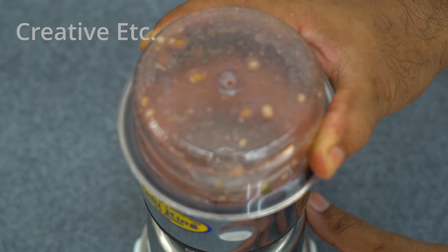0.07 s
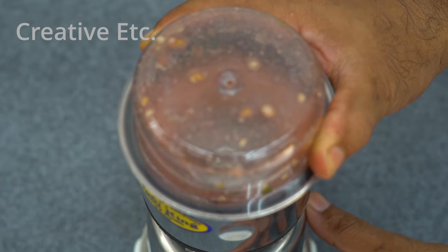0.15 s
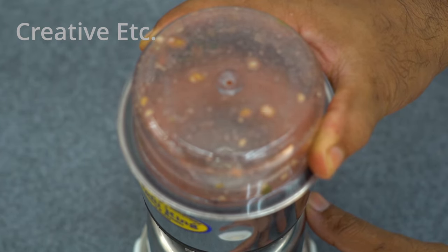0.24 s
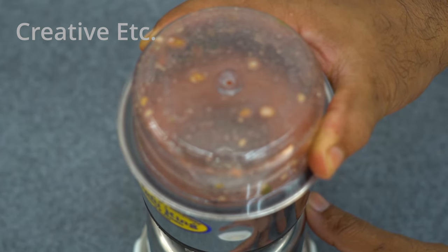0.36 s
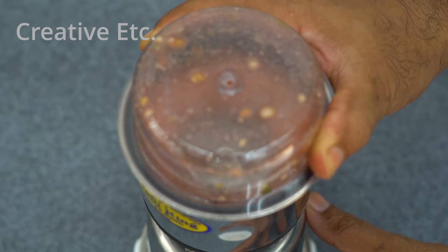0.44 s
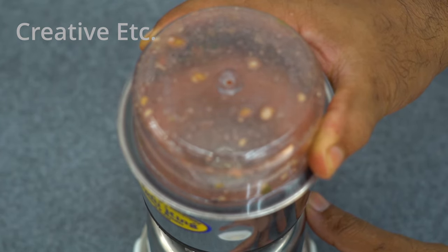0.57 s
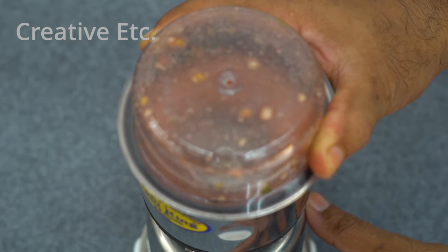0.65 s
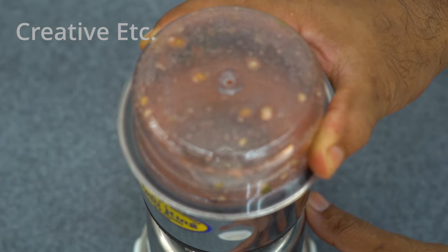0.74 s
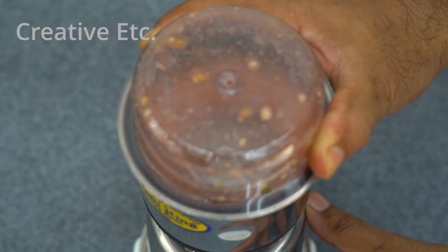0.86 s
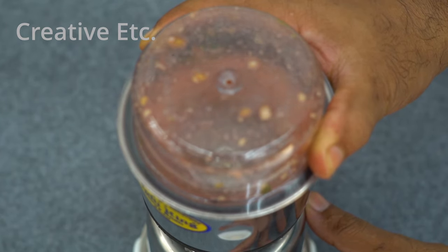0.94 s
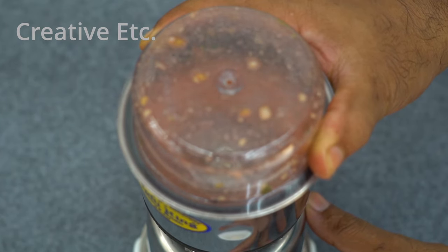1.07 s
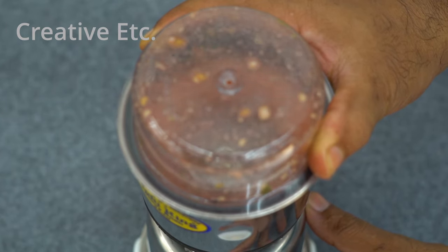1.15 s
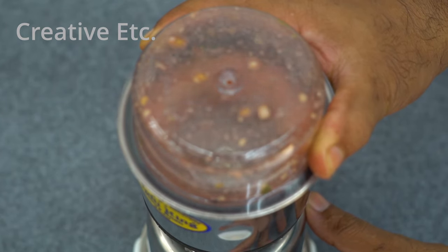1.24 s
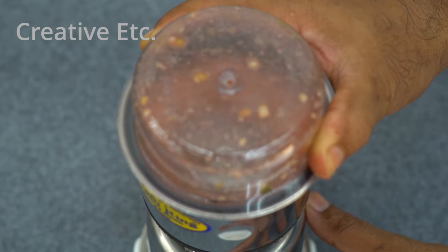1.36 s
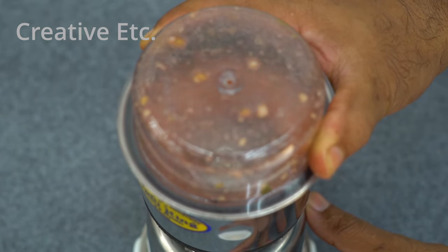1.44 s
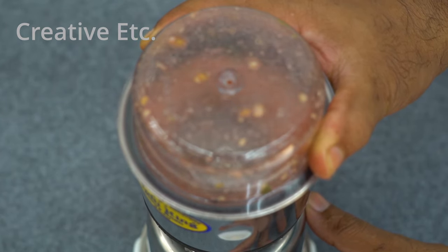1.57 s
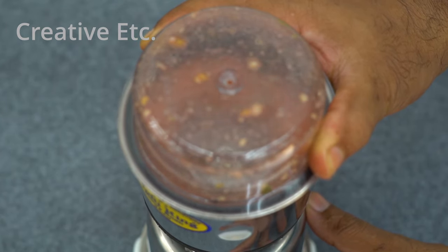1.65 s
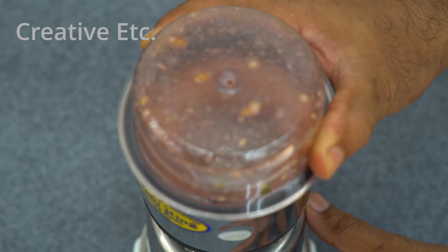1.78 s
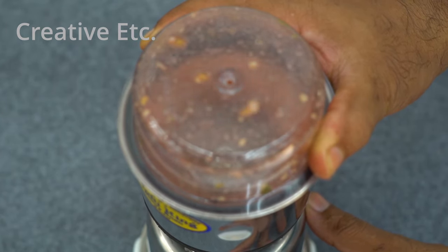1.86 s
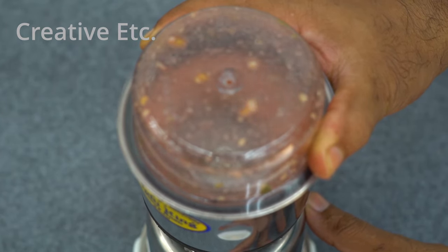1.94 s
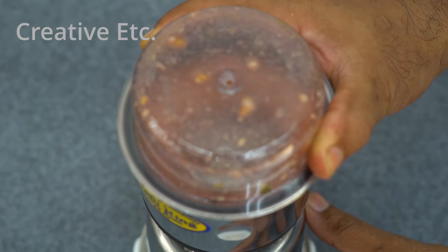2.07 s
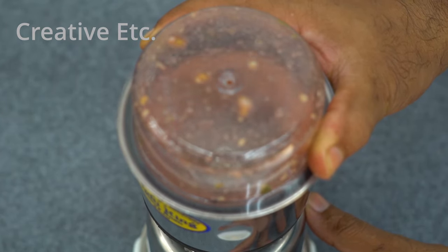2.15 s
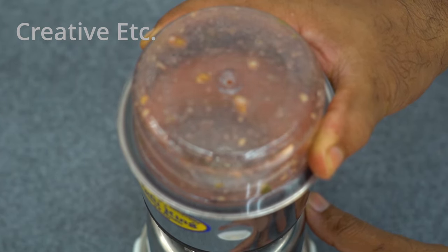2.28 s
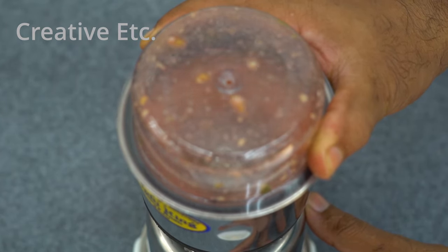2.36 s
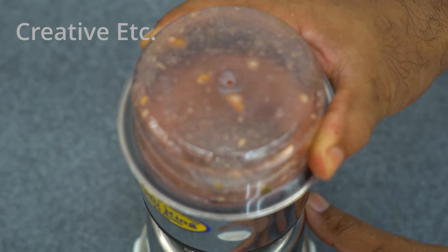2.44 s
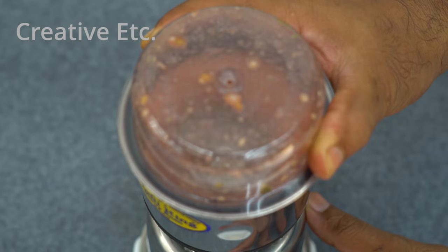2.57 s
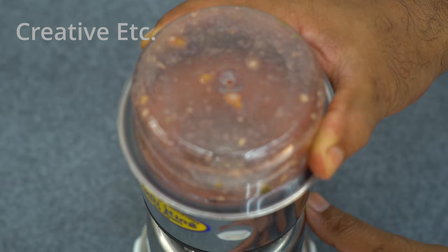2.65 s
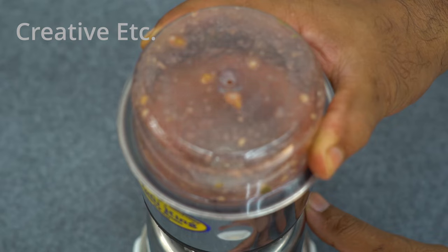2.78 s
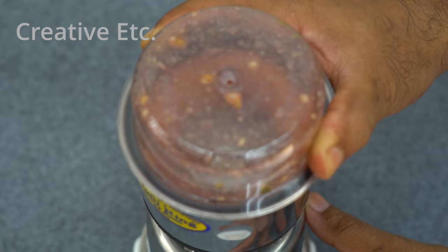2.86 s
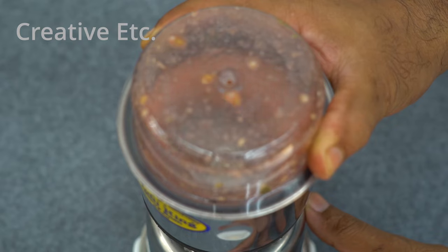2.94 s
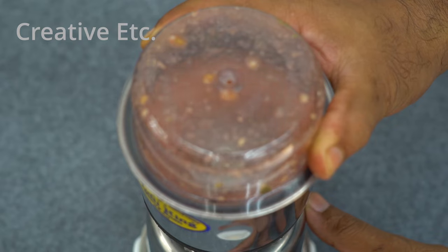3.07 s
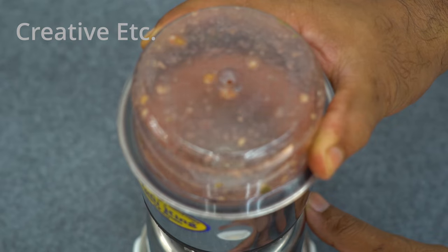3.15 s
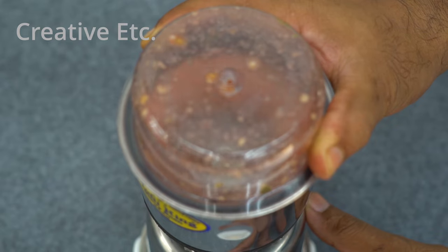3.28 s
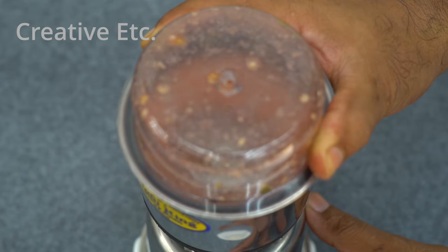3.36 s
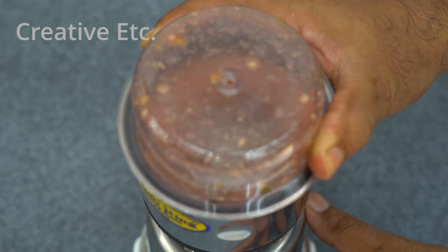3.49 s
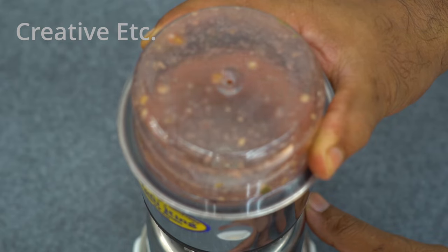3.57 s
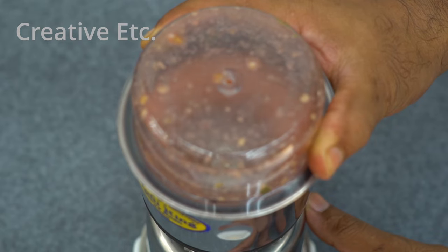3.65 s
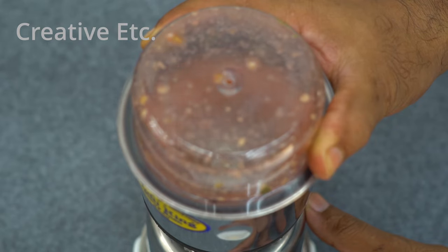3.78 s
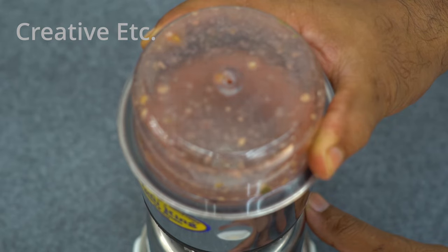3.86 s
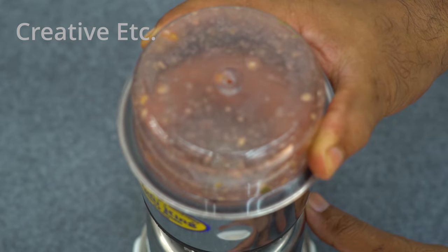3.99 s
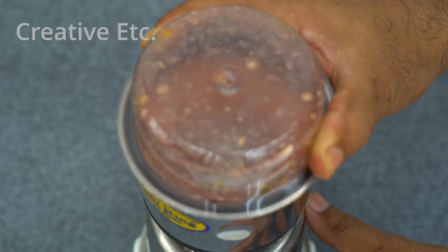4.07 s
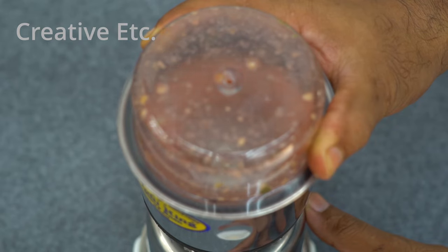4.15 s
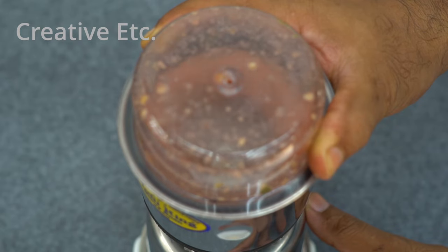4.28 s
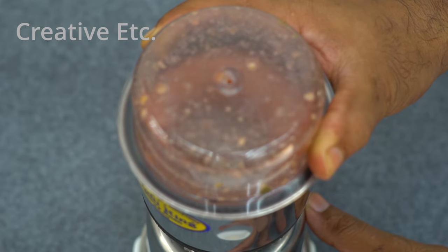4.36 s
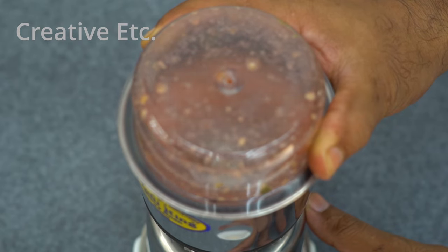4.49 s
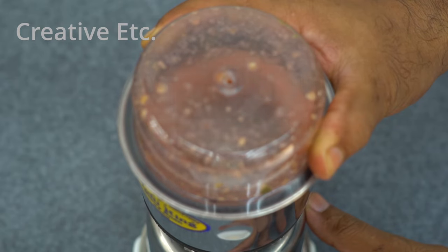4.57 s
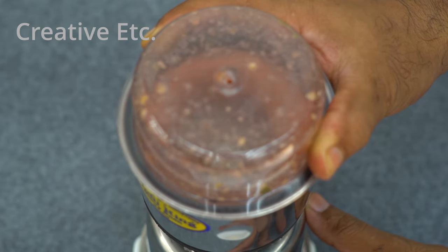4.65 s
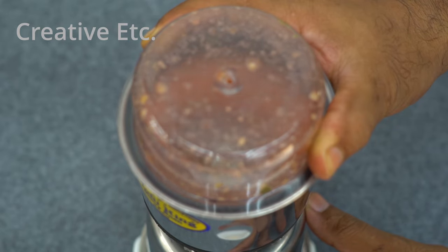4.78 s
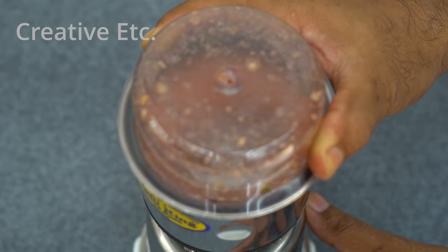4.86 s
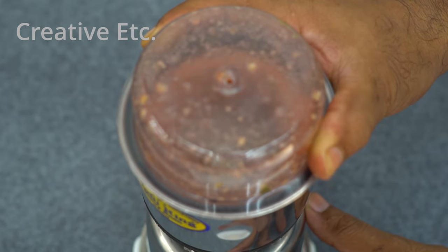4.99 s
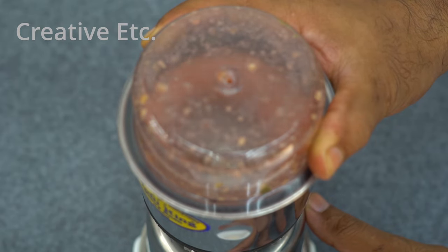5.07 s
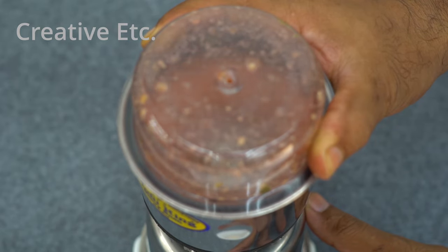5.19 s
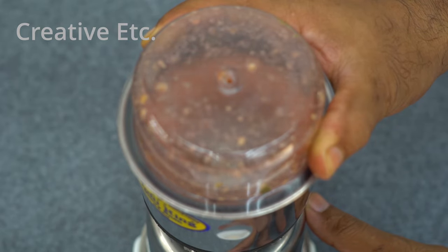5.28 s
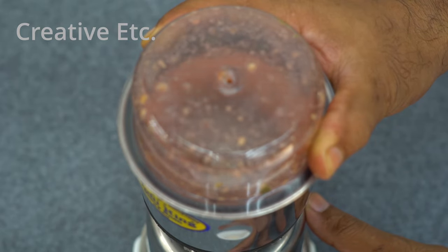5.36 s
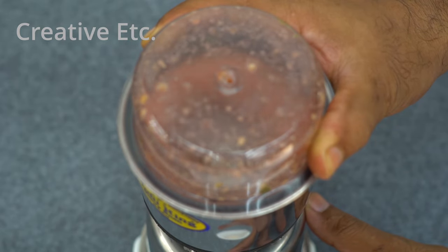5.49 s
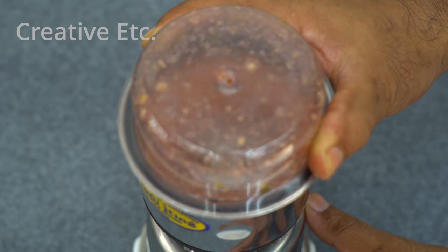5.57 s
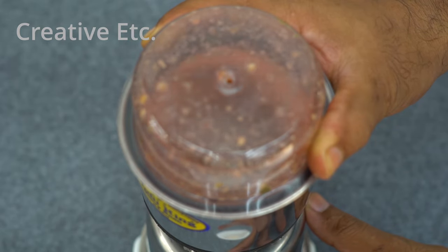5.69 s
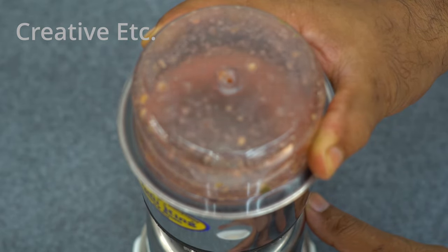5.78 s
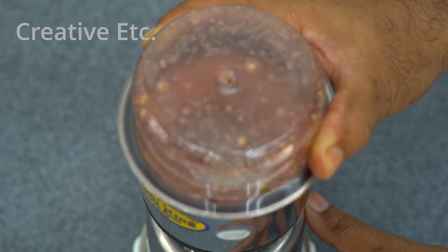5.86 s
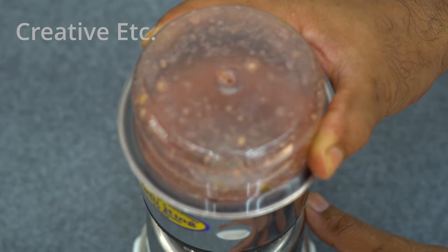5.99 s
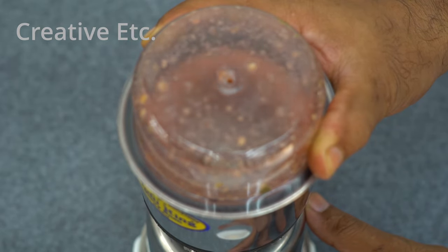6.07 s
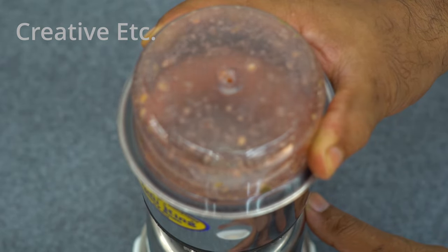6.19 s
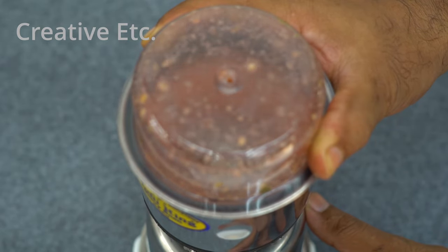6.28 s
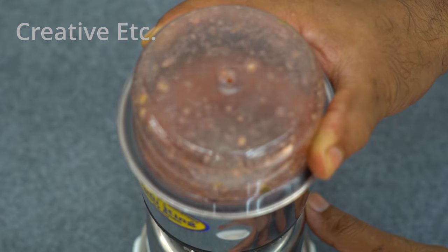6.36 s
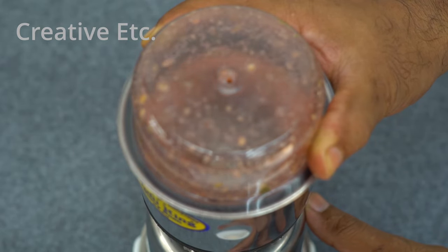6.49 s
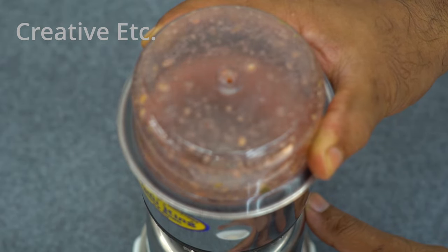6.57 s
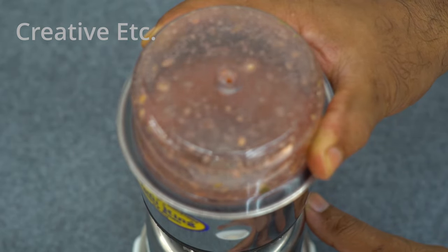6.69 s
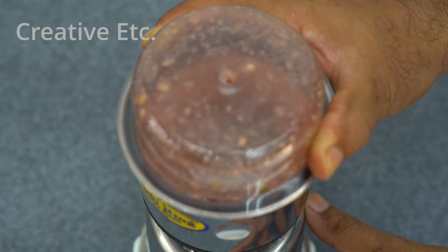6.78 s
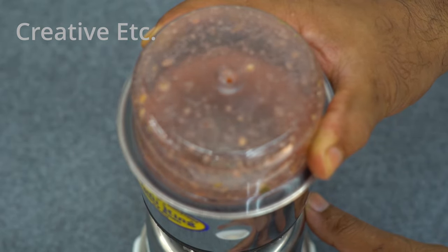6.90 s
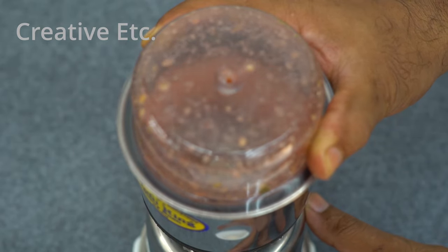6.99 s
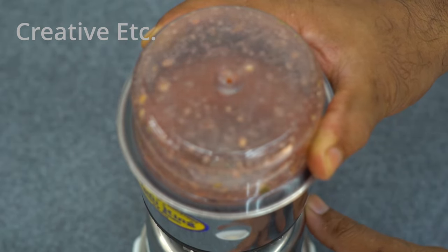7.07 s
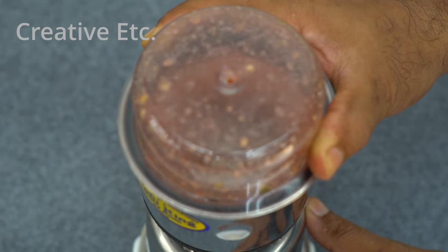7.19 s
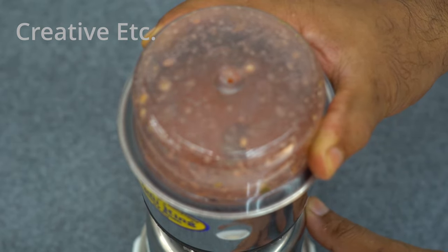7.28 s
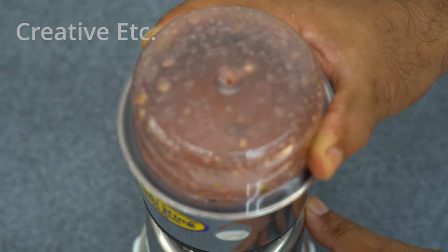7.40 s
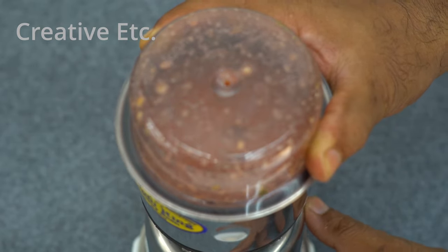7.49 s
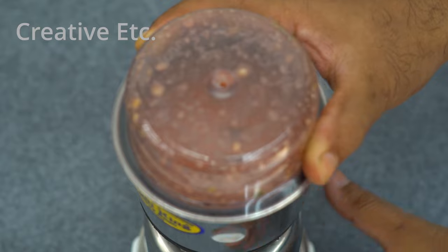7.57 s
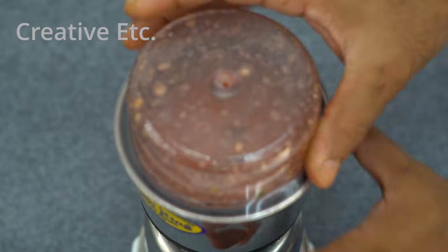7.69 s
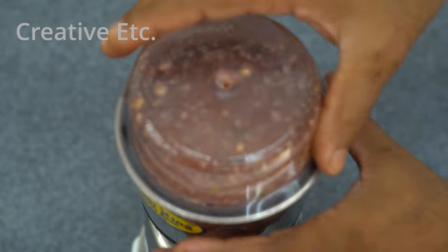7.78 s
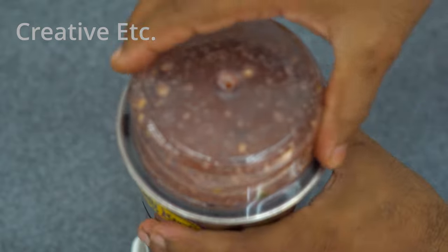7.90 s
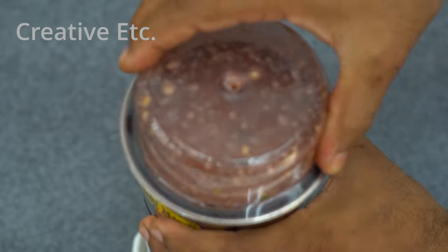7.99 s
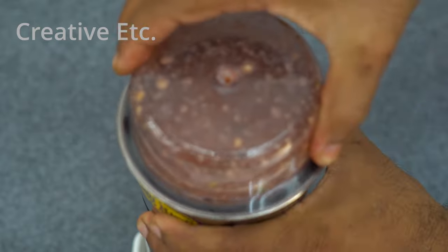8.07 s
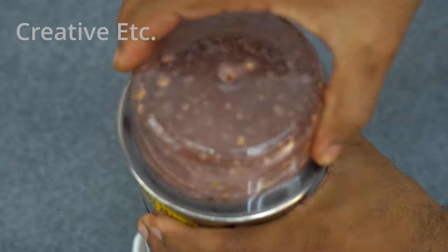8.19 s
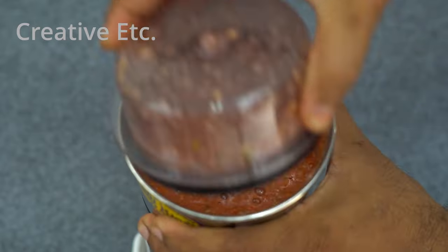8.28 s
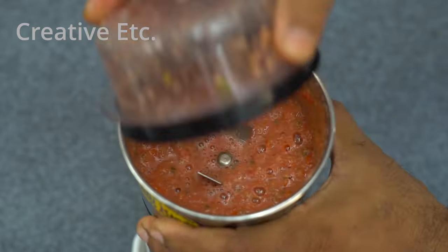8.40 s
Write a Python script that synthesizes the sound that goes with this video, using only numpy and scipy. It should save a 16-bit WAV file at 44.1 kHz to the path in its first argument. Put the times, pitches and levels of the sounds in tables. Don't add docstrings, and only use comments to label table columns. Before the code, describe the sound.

From 0 to 7.2 s a small motor runs continuously, loud and close: a rough, noisy grind strongest between about 1 and 4 kHz, fluttering as wet food batters plastic and metal walls, with bright spray above and a low hum and table rumble beneath. It eases very slightly as chunks become paste. Dull can thumps come at 3.3 and 4.1 s; at about 4.26 s the grind dips for an instant, then kicks back. At 7.2 s it cuts off, dying within a few tenths into quiet fan air around 1.4 kHz and a barely audible high whine. Faint finger ticks and brushing follow from 7.3 s, a soft squeak around 7.8 to 8.05 s. From 8.0 s the jar twists in jerks: gritty scrapes, hollow low moans, ringing creaks, strongest at 8.2 and 8.3 s, with knocks thickening until the end at about 8.4 s.

```python
import sys
import numpy as np
from scipy import signal
from scipy.fft import rfft, irfft, next_fast_len
from scipy.io import wavfile
from scipy.ndimage import uniform_filter1d

SR = 44100
rng = np.random.default_rng(int(sys.argv[2]) if len(sys.argv) > 2 else 0)


def decibels_to_gain(level_db):
    exponent = np.asarray(level_db, float) / 20
    return 10 ** exponent


def digitize_waveform(pressure):
    field = np.atleast_2d(pressure).T
    bounded = np.clip(field, -1, 1)
    quanta = np.round(bounded * 32767).astype(np.int16)
    wavfile.write(sys.argv[1], SR, quanta)


N = 372195
T = np.arange(N) / SR
BINS_HZ = np.arange(N // 2 + 1) * SR / N
STOP_S = 7.191

# frequency in Hz, density in dB per Hz.
CHURN = [(120, -67.5), (200, -2.5), (333, -22.5), (455, -8), (526, -4.5), (927, -13), (1290, -13),
         (2150, -6), (2580, -5.5), (2870, -5.5), (3920, -10), (7290, -10), (9590, -14.5), (13300, -13),
         (15700, -15)]
WALL_HZ = [335, 530, 656, 819, 1168, 1301, 1400, 1505, 1620, 1760, 1890, 2005, 2108, 2212, 2375, 2620, 2785,
           2870, 2945, 3070, 3180, 3300, 4300, 4965, 5685, 6050, 7000, 7430, 7950, 8150, 10700, 13100]
# width in Hz, level in dB over the churn.
WALLS = [(50.1, -14.5), (40, 13.5), (45.2, 8), (41.6, 2), (39.7, -4), (44.7, 7.5), (50, -1), (50, 5.5),
         (49.7, 3), (119.6, 0), (59.5, 1.5), (59, 5.5), (49.4, 1), (50, 5.5), (63.1, 4), (196, -4),
         (50, -4), (54.7, 7), (50, 0), (70, -6), (109, 0), (60, -24), (90, -10), (55.8, 4.5), (60, 0),
         (91.7, -3.5), (120, 1), (50, 8.5), (50.25, 2), (70, 2), (90, -1), (260, -5.5)]
# time in seconds, level in dB.
GRIP = [(0.0, 0.3), (0.09, -3), (0.21, 2), (0.3, 1.0), (0.39, 2), (2.1, 0.9), (4.65, -1.7), (4.74, 0.5),
        (4.83, -1.5), (4.98, -4.2), (5.28, -1.5), (5.37, -2.8), (6.27, 0.7), (6.42, 0.5), (6.78, -5.5),
        (6.93, -2.8), (7.02, 1), (7.15, -3.2)]
# frequency in Hz, left minus right in dB.
PORTS = [(200, -7), (400, 1.5), (1300, -0.5), (2300, -2.5), (2900, -0.5), (3500, 1), (4000, 2), (5000, 0),
         (6400, 4.5), (7400, 1.5), (8800, 1.5), (15000, 3.5)]
# start in seconds, radians.
PORT_TURNS = [(0.0, -0.7), (0.14, 1.5), (0.2, 3.0), (0.25, 0.0), (0.32, 3.1), (0.36, -0.0), (0.39, 1.9),
              (0.52, 0.1), (0.57, 3.2), (0.62, 5.9), (0.73, 4.2), (0.81, 5.2), (1.19, 4.3), (1.3, 2.6),
              (1.43, 4.7), (1.57, 2.1), (1.6, -0.9), (1.89, 1.4), (1.97, 3.4), (2.06, 1.7), (2.12, 4.7),
              (2.2, 3.4), (2.31, 0.6), (2.41, -1.3), (2.71, -4.1), (2.91, -1.4), (2.94, -4.0), (3.1, -6.1),
              (3.2, -9.2), (3.32, -6.7), (3.4, -4.4), (3.48, -7.4), (3.59, -9.8), (3.77, -8.2),
              (3.95, -10.4), (4.09, -12.9), (4.2, -15.2), (4.71, -16.4), (5.01, -15.5), (5.2, -18.2),
              (5.38, -16.7), (5.55, -14.9), (5.66, -13.1), (5.7, -15.9), (5.74, -13.1), (5.78, -10.6),
              (5.84, -9.3), (5.97, -8.3), (6.08, -6.7), (6.15, -3.8), (6.29, -6.8), (6.36, -9.4),
              (6.41, -11.5), (6.59, -14.6), (6.69, -12.5), (6.84, -15.2), (6.91, -17.1), (7.01, -18.6),
              (7.13, -16.0), (7.25, -17.9)]
RUN_EDGES_HZ = [230, 450, 950, 4000, 6500, 10500, 15700]
RUN_T60_S = [0.2, 0.31, 0.41, 0.28, 0.21, 0.19]
SPRAY_DB = [-47, -48, -54]
# time in seconds, level in dB.
SHAKE = [(0.0, 1.5), (0.09, 1.5), (0.54, 1.5), (1.38, 0.8), (1.98, 1.5), (2.13, 0.5), (2.58, 0),
         (2.67, 2.2), (2.85, -1), (3.09, -3.5), (3.18, -2), (3.57, -2.8), (3.69, -0.5), (3.96, -0.0),
         (4.44, 0.5), (6.03, -2.5), (7.08, 0), (7.15, 4.2)]
# start in seconds, hold in seconds, level in dB.
ROCKS = [
    (3.26, 0.045, -50.5),
    (3.38, .09, -59.5),
    (4.09, 0.12, -47.5),
    (4.33, 0.074, -54),
    (4.42, 0.058, -54),
]
# time in seconds, level in dB.
PRESS = [(0.0, 11.7), (0.15, 4), (0.33, 0), (0.45, 6.5), (0.54, 12.5), (0.63, -2), (0.72, -8), (0.81, -1.0),
         (0.9, -0.3), (0.99, 4), (2.28, 1), (2.79, -1), (3.45, -3), (3.63, -6), (4.26, -0.5), (6.33, -8),
         (6.99, -4), (7.15, -1)]
# frequency in Hz, density in dB per Hz.
ROOM = [(60, -39), (190, -28), (300, -21), (600, -29.5), (980, -23.5), (1150, -10), (1400, -3.5),
        (1750, -13), (1900, -24), (2300, -27.5), (3500, -29.5), (6500, -32), (7500, -39), (14000, -43)]
# centre in Hz, width in Hz, level in dB over the fan.
DUCT = (1000, 22, 4)
# frequency in Hz, level in dB rms.
LAMP = [(14783, -107), (14879, -83), (14982, -88), (15079, -86)]
# centre in seconds, length in seconds, Hz, width in Hz, level
# in dB.
BURSTS = [(7.72, .035, 3150, 350, -77), (7.72, .03, 5000, 1500, -78), (7.72, .03, 7300, 2000, -84),
          (7.66, .14, 4750, 60, -92), (7.7, .12, 5380, 80, -86), (7.7, .12, 10000, 200, -95),
          (7.6, .12, 6200, 300, -95), (7.9, .08, 6500, 100, -94), (7.7, .1, 2540, 40, -91),
          (7.8, .05, 2370, 40, -91), (7.6, .4, 1930, 15, -92), (7.47, .12, 2900, 700, -84),
          (7.62, .12, 4000, 2500, -89), (7.53, .12, 2830, 60, -87), (7.33, .06, 1270, 30, -68),
          (7.36, .1, 1260, 50, -70), (7.505, .012, 900, 900, -76), (7.56, .1, 700, 300, -86),
          (8.075, .08, 915, 30, -76), (8.115, .025, 1250, 50, -70), (7.44, .12, 2800, 70, -74)]
# start in seconds, level in dB, frequency in Hz, left minus right in dB.
KNOCKS = [(7.501, -79, 685, -1), (8.0, -69, 336, -2), (8.042, -69, 333, 1.5), (8.087, -68, 680, 2.0),
          (8.2, -63, 660, 1.0), (8.203, -63, 270, -3), (8.286, -57, 636, 1.0), (8.315, -60, 474, 5),
          (8.371, -53, 685, 2), (8.374, -54, 438, 3), (8.4, -53, 710, 4), (8.407, -52, 341, -2),
          (8.424, -50, 321, 2)]
# time in seconds, slip rate in Hz, level in dB.
SQUEAK = [
    (7.78, 312, -94),
    (7.81, 306, -77),
    (7.9, 291, -79),
    (8.0, 279, -67),
    (8.05, 285, -80),
]
TWIST_EDGES_HZ = [230, 1100, 3600, 9300, 10500, 14200]
# centre in Hz, width in Hz, level in dB.
EMPTY_MODES = [(325, 60, -5), (475, 50, -8), (650, 70, -6), (926, 55, -12),
               (1490, 48, -8), (1860, 30, -9), (2100, 40, -5), (2210, 45, -5), (2360, 50, -8), (3110, 50, -6),
         (1250, 45, -7), (4170, 110, -9), (4420, 60, -10), (8720, 60, -15), (5960, 100, -19),
         (6380, 90, -16), (6770, 85, -16), (7300, 120, -15), (7750, 200, -16), (8150, 150, -12),
         (2870, 120, -17), (5300, 300, -23)]
# start in seconds, hold in seconds, scrape in dB, extra edge in dB.
TURNS = [
    (7.98, 0.15, -69.5, -9),
    (8.166, 0.046, -65.5, -10),
    (8.293, 0.069, -58, -1),
]
# start in seconds, hold in seconds, level in dB.
JERKS = [(8.02, .03, -72), (8.07, .015, -66), (8.17, .015, -66), (8.197, .006, -51.5), (8.23, .008, -70),
         (8.255, .006, -67), (8.295, .01, -62), (8.316, .008, -57), (8.35, .025, -70), (8.4, .03, -70)]
# start in seconds, hold in seconds, level in dB.
SLIDES = [(8.0, .04, -74), (8.045, .04, -68), (8.1, 0.0073, -71), (8.14, .015, -68), (8.175, .065, -80),
          (8.3, .015, -74), (8.32, .01, -67), (8.345, .01, -63), (8.395, .04, -59)]
# start in seconds, hold in seconds, level in dB.
DRAGS = [
    (8.03, 0.07, -72),
    (8.2, 0.024, -64),
    (8.3, 0.059, -56),
    (8.37, 0.025, -52),
    (8.405, .04, -60),
]
# start in seconds, hold in seconds, level in dB.
BITES = [
    (8.172, .008, -68),
    (8.19, .04, -77),
    (8.3, .01, -73),
    (8.335, 0.025, -77),
]
# time in seconds, frequency in Hz, level in dB.
MOAN = [(8.08, 325, -86), (8.12, 295, -68), (8.21, 335, -65), (8.27, 310, -67), (8.292, 365, -63),
        (8.32, 308, -66), (8.35, 312, -61), (8.39, 310, -66), (8.43, 325, -59)]


def unit(x):
    return x / np.sqrt(np.mean(x ** 2))


def columns(table):
    s, *cols = np.transpose(table)
    return [np.interp(T, s, c) for c in cols]


def colour(x, points, share=1):
    hz, db = np.transpose(points)
    gain_db = share * np.interp(np.log(BINS_HZ + 1), np.log(hz), db)
    return irfft(rfft(x) * decibels_to_gain(gain_db), N)


def split(x, edges_hz, steep=8):
    spectrum = rfft(x)
    below = [1 / (1 + (BINS_HZ / hz) ** steep) for hz in edges_hz]
    return [unit(irfft(spectrum * (high - low), N)) for low, high in zip(below, below[1:])]


def ring(x, hz, width_hz):
    return signal.lfilter(*signal.iirpeak(hz, hz / width_hz, SR), x)


def ring_twice(x, hz, width_hz):
    return ring(ring(x, hz, width_hz), hz, width_hz)


def walk(rate):
    k = int(SR / rate)
    held = np.repeat(rng.standard_normal(N // k + 1), k)
    return unit(uniform_filter1d(uniform_filter1d(held, k), k)[:N])


def flutter(rate):
    x = walk(rate)
    return x - uniform_filter1d(x, size=SR // 4)


def linger(gain, t60_s):
    keep = np.exp(-2 * np.log(1000) / (t60_s * SR))
    energy, _ = signal.lfilter([1 - keep], [1, -keep], gain ** 2, zi=[keep * gain[0] ** 2])
    return np.sqrt(energy)


def strokes(rows, attack_s, t60_s):
    power = 0
    for s, hold, db in rows:
        rise = np.clip((T - s) / attack_s, 0, 1)
        fall_db = 60 / t60_s * np.maximum(T - s - attack_s - hold, 0)
        power = power + (rise * decibels_to_gain(db - fall_db)) ** 2
    return np.sqrt(power)


def alike(x, share, turn):
    turned = np.real(signal.hilbert(x[0], next_fast_len(N))[:N] * np.exp(1j * turn))
    return np.array([x[0], np.sqrt(1 - min(share, .99) ** 2) * x[1] + share * turned])


def phase_steps():
    s, turn = np.transpose(PORT_TURNS)
    held = turn[np.clip(np.searchsorted(s, T) - 1, 0, None)]
    return uniform_filter1d(held, size=600) + .3 * walk(25) + .3 * walk(11)


def clatter(rate, spread_db, tail_s):
    size_db = spread_db * np.minimum(rng.exponential(size=N), 3)
    kicks = (rng.random(N) < rate / SR) * decibels_to_gain(size_db) ** 2
    swell = signal.lfilter([1], [1, -np.exp(-1 / (tail_s * SR))], kicks)
    return unit(np.sqrt(1 + uniform_filter1d(swell, size=40)) * rng.standard_normal((2, N)))


def detour(x):
    share, longest_ms, jumps_per_s = .48, 4.5, 16
    k = int(SR / jumps_per_s)
    lengths = rng.uniform(-0.998, 1, N // k + 1) * longest_ms * SR / 1000
    lag = np.repeat(lengths, k)[:N].astype(int)
    delayed = x[0][np.clip(np.arange(N) - lag, 0, N - 1)]
    echo = split(delayed, [700, 5500], steep=12)[0] * np.std(x[1])
    return np.array([x[0], np.sqrt(1 - share ** 2) * x[1] + share * echo])


def walls_rung_by_food():
    churn = colour(clatter(150, 1.0, 0.0013), CHURN)
    walls, grip_db = 0, 1.3 * columns(GRIP)[0]
    damping_db = -0.34 * (T - 3.5)
    for hz, (width, db) in zip(WALL_HZ, WALLS):
        swing_db = np.clip(hz / 1500, .4, 1) * (2.3 * flutter(18) + .4 * walk(2))
        if 2700 < hz < 3050:
            swing_db += grip_db
        else:
            swing_db += damping_db * (2000 < hz < 3500)
        lean = np.pi / 4 * (1 + np.tanh(walk(7)))
        shift_hz = .22 * width
        mode = np.cos(lean) * ring(churn, hz - shift_hz, width)
        mode = mode + np.sin(lean) * ring(churn, hz + shift_hz, width)
        walls = walls + decibels_to_gain(db + swing_db) * mode
    ceiling = 4.5
    return np.tanh(unit(churn + walls) / ceiling)


def rocking():
    return strokes(ROCKS, attack_s=.015, t60_s=0.46)


def run_gains():
    shake_db = columns(SHAKE)[0]
    jam_s, jam_length_s, dip_db, break_db, break_s = 4.255, 0.031, -18.5, 11.5, 0.013
    after = T - jam_s - jam_length_s
    jam_db = dip_db * np.exp(-(2 * (T - jam_s) / jam_length_s - 1) ** 2 * 2)
    jam_db = jam_db + break_db * (after > 0) * np.exp(-np.abs(after) / break_s)
    thump = np.hypot(decibels_to_gain(-62.5 + 0.38 * shake_db), rocking())
    hum = decibels_to_gain(-48 + shake_db)
    grind = decibels_to_gain(-34 - 0.1243 * T + jam_db)
    return [thump, hum, grind] + [decibels_to_gain(db + 0.4 * jam_db) for db in SPRAY_DB]


def blender(turn):
    left, right = walls_rung_by_food()
    both = np.array([colour(left, PORTS, share=0.99), colour(right, PORTS, share=-0.16)])
    thump, hum, grind, *spray = split(both, RUN_EDGES_HZ)
    thump = unit(ring(ring(thump, 325, 110), 335, 110))
    bands = [alike(thump, .97, turn), alike(hum, .8, turn), detour(grind)] + spray
    slosh = flutter(8)
    flicker_db = [1.7 * walk(14), .9 * flutter(12), .45 * slosh + .5 * flutter(24),
                  .5 * slosh + .4 * flutter(8), .5 * slosh + .7 * flutter(10), .4 * slosh + 1.2 * walk(9)]
    out = 0
    for band, gain, db, t60_s in zip(bands, run_gains(), flicker_db, RUN_T60_S):
        out = out + band * linger(gain * decibels_to_gain(db) * (T < STOP_S), t60_s)
    return out


def table(turn):
    modes = ring(ring(rng.standard_normal((2, N)), 92, 55), 110, 80)
    shake = unit(alike(modes, .99, turn - .45 * np.sin(2 * turn)))
    level_db = -82 + columns(PRESS)[0] + 2.6 * walk(6)
    return shake * linger(decibels_to_gain(level_db) * (T < STOP_S), 0.5)


def room():
    air = colour(rng.standard_normal((2, N)), ROOM)
    hz, width, db = DUCT
    level_db = -72 + 1.1 * walk(4.8) + 1.8 * walk(30)
    fan = decibels_to_gain(level_db) * unit(air + decibels_to_gain(db) * ring(air, hz, width))
    quarter = np.array([[0], [np.pi / 2]])
    return fan + sum(np.sqrt(2) * decibels_to_gain(db) * np.sin(2 * np.pi * hz * T + quarter) for hz, db in LAMP)


def bursts():
    out = np.zeros((2, N))
    for s, length, hz, width, db in BURSTS:
        age = np.arange(int(2 * length * SR)) / SR - length
        hiss = unit(ring_twice(rng.standard_normal((2, SR)), hz, width))[:, -len(age):]
        i = int((s - length) * SR)
        out[:, i:i + len(age)] += decibels_to_gain(db) * np.exp(-(2 * age / length) ** 2) * hiss
    return out


def knocks():
    out = np.zeros((2, N))
    age = np.arange(SR // 4) / SR
    lag = np.array([[0], [2.1]])
    fade = np.exp(-np.log(1000) * age / 0.07) * (1 - np.exp(-age / 0.0033))
    for s, db, hz, pan_db in KNOCKS:
        crack = .5 * np.exp(-age / 0.011) * ring_twice(rng.standard_normal((2, len(age))), 800, 900)
        body = 2.2 * fade * np.sin(2 * np.pi * hz * age + lag) + crack
        port_db = db + 9 + np.array([[pan_db], [-pan_db]]) / 2
        i = int(s * SR)
        out[:, i:i + len(age)] += (decibels_to_gain(port_db) * body)[:, :N - i]
    return out


def squeak():
    hz, db = columns(SQUEAK)
    phase = 2 * np.pi * np.cumsum(hz * (1 + 0.0051 * walk(44))) / SR + np.array([[0], [2.2]])
    sounding = (T > SQUEAK[0][0]) & (T < SQUEAK[-1][0])
    partials = 0.76 * np.sin(phase) + 1.1 * np.sin(2 * phase) + 0.12 * np.sin(3 * phase)
    return sounding * decibels_to_gain(db + 3.8 * walk(35)) * partials


def twist():
    rub = clatter(90, 1.5, 0.0022)
    can = decibels_to_gain(-34) * rub
    for hz, width, db in EMPTY_MODES:
        can = can + decibels_to_gain(db + 1.8 * walk(30)) * ring(rub, hz, width)
    body, wall, scrape, edge, air = split(can, TWIST_EDGES_HZ, steep=30)
    gentle = np.clip((T - TURNS[0][0]) / 0.08, 0, 1) ** 1.2
    turns = gentle * strokes([row[:3] for row in TURNS], 0.02, 0.36)
    sharp = gentle * strokes([(s, hold, db + extra) for s, hold, db, extra in TURNS], 0.02, 0.18)
    ringing = decibels_to_gain(2) * turns * wall
    ringing = ringing + strokes(JERKS, .008, 0.12) * unit(ring_twice(rub, 3080, 91))
    singing = strokes(SLIDES, .008, 0.12) * unit(ring_twice(rub, 2180, 91))
    biting = strokes(BITES, .004, 0.12) * unit(ring_twice(rub, 7900, 690))
    dragging = alike(body * np.hypot(decibels_to_gain(-11.5) * turns, strokes(DRAGS, .008, 0.41)), .9, 2.4)
    scraping = (scrape + decibels_to_gain(-33) * air) * turns + decibels_to_gain(-24) * edge * sharp
    return dragging + biting + ringing + singing + scraping


def moan():
    hz, db = columns(MOAN)
    phase = 2 * np.pi * np.cumsum(hz * (1 + .02 * walk(40))) / SR + np.array([[0], [2.6]])
    return (T > MOAN[0][0]) * decibels_to_gain(db + 3 * walk(45)) * np.sqrt(2) * np.sin(phase)


def scene():
    turn = phase_steps()
    motor = blender(turn) + table(turn)
    hands = bursts() + twist() + moan()
    return np.sqrt(2) * (motor + room() + hands) + knocks() + squeak()


def top_cut(x):
    return signal.sosfilt(signal.butter(12, 16220, fs=SR, output="sos"), x)


def record(dry):
    top = signal.ellip(14, .2, 80, 15710, fs=SR, output="sos")
    mix = signal.sosfilt(top, dry)
    return top_cut(mix)


dry = scene()
out = record(dry)
digitize_waveform(out)
```